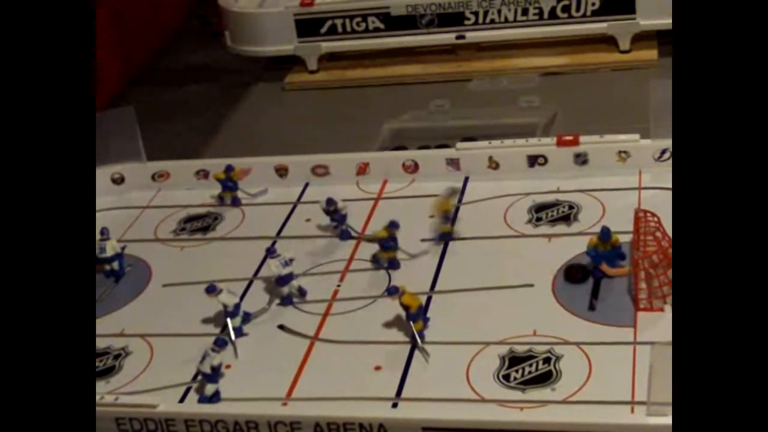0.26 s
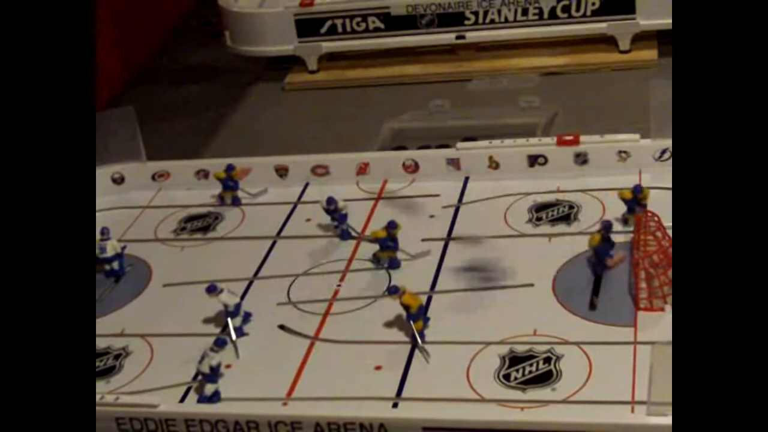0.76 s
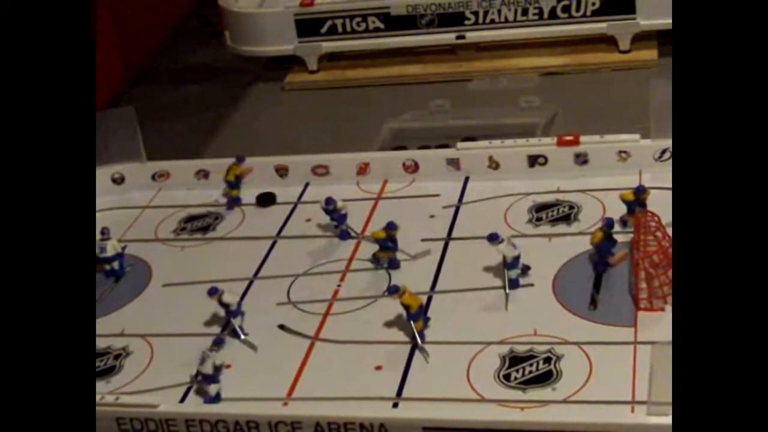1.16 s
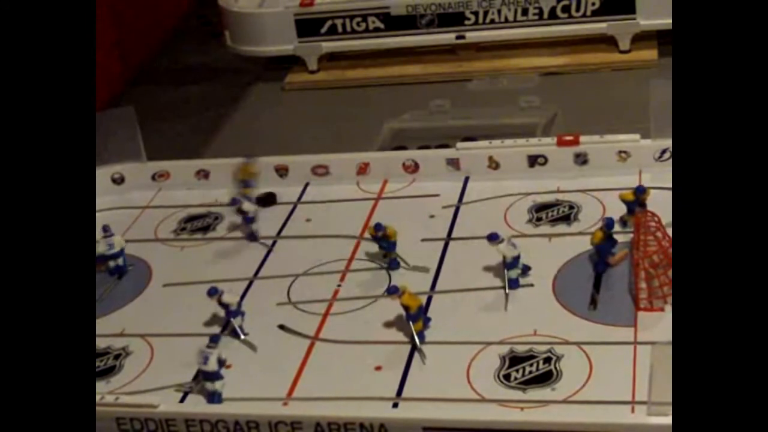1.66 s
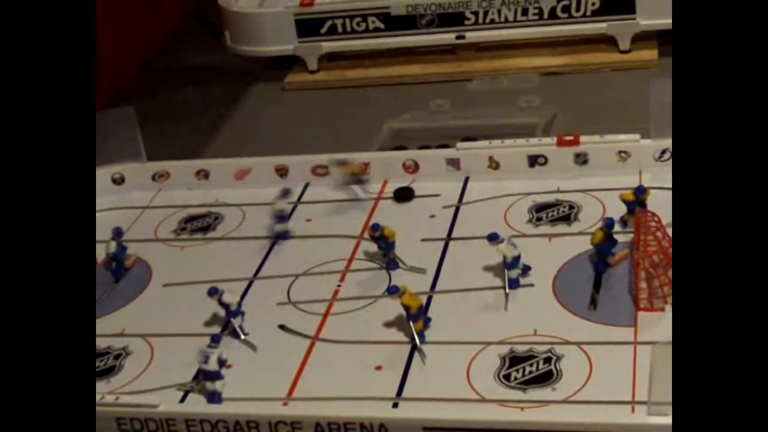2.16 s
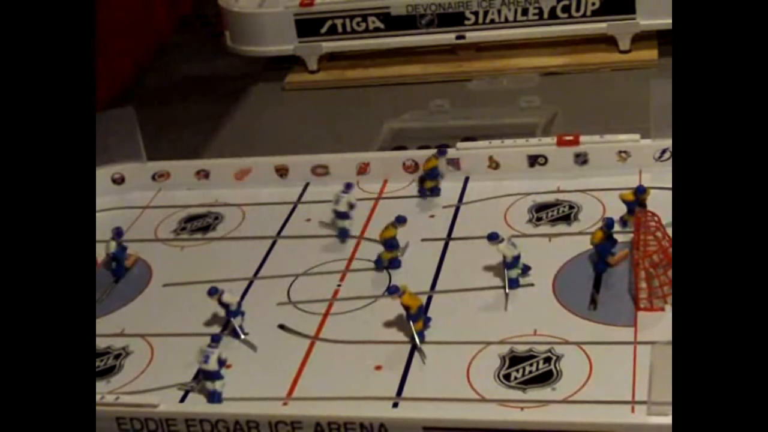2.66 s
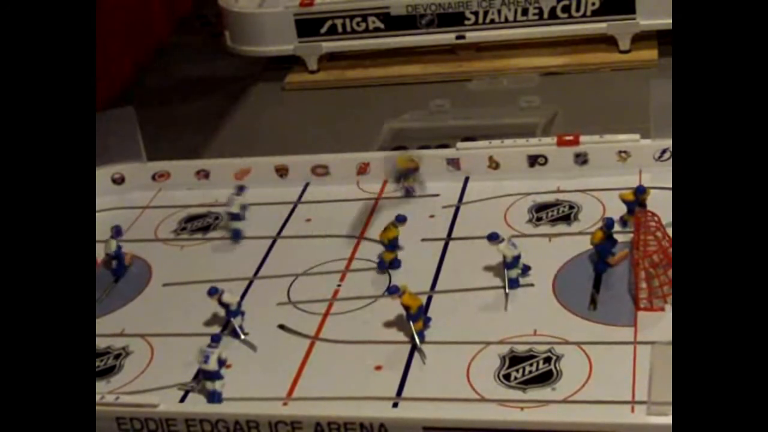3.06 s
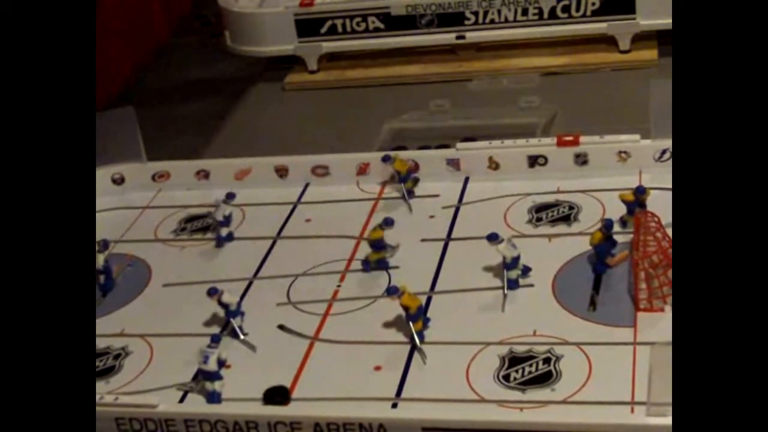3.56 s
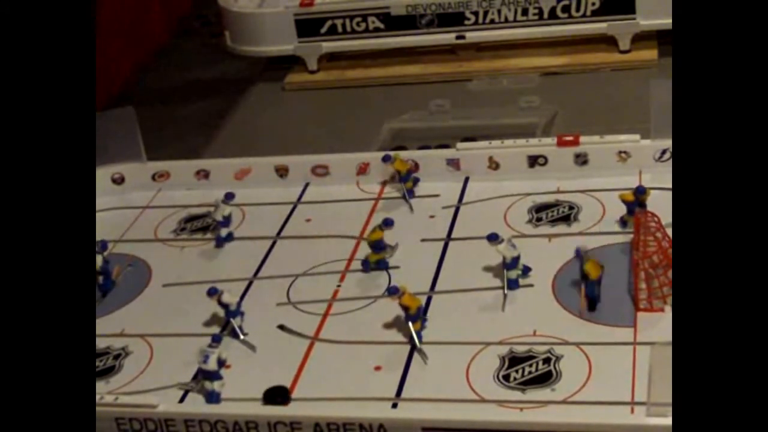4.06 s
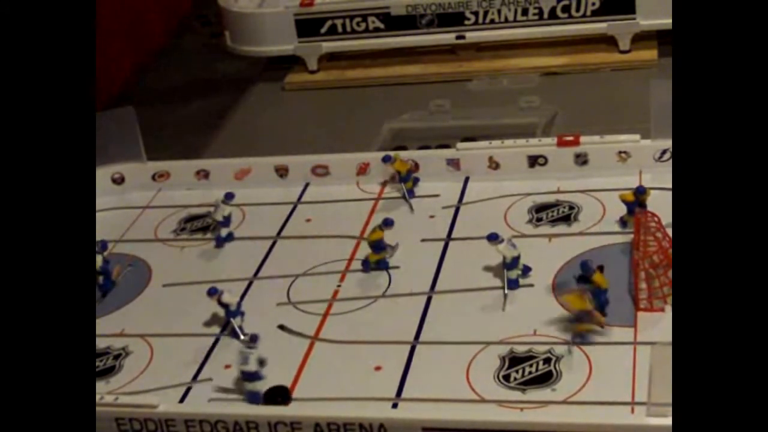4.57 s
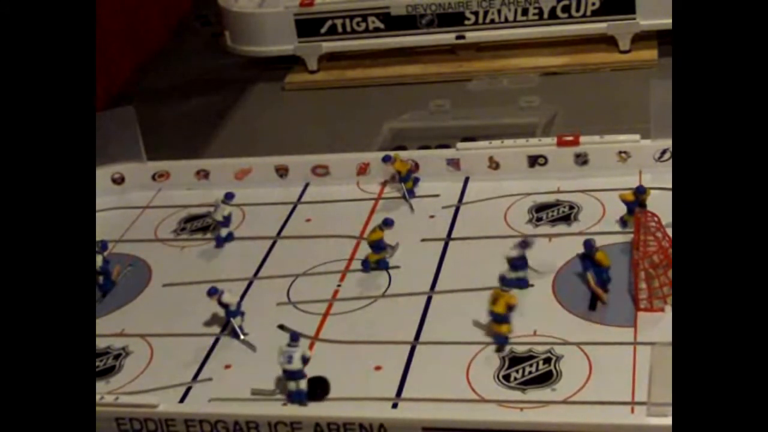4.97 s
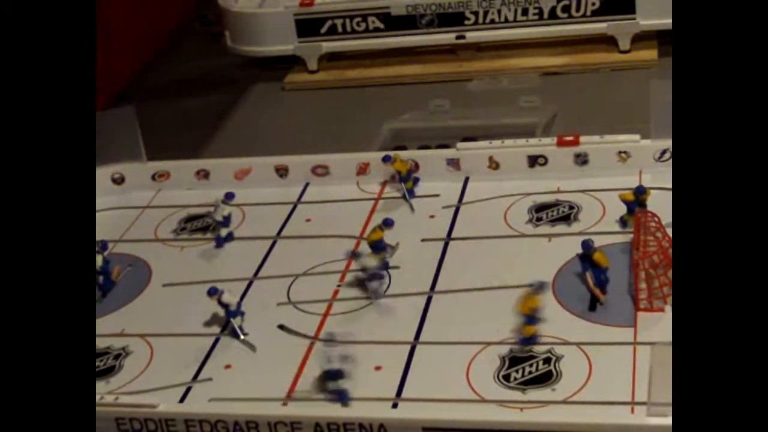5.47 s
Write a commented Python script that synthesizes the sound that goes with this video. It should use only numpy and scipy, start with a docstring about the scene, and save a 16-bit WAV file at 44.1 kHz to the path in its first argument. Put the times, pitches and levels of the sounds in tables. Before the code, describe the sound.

Close, dry clacks and scraping rods of a table hockey game, broken by three overloading cracks of the puck against the rink boards.

```python
"""Knocks, rattles, clacks and sliding rods of a table hockey game in a small room, close to the microphone,
with three hard shots that bang into the boards and overload the microphone.
Touches on the plastic rink excite a bank of damped modes; blade, boards and rods add modes of their own.
Sliding is a stream of tiny friction slips; the room is a diffuse noise tail over the blows.
Steady room noise and a narrow electronic hiss lie beneath."""
import sys
import numpy as np
from scipy import signal
from scipy.fft import rfft, irfft, next_fast_len
from scipy.io import wavfile

SR = 44100
rng = np.random.default_rng(int(sys.argv[2]) if len(sys.argv) > 2 else 0)


def generate_wav(sig):
    """Save sig (samples, or channels by samples) to the path in sys.argv[1] as 16-bit PCM at SR."""
    pcm = np.round(np.clip(np.atleast_2d(sig).T, -1, 1) * 32767).astype(np.int16)
    wavfile.write(sys.argv[1], SR, pcm)


N = 252693
TIME = np.arange(N) / SR
RING_TIME = TIME[:SR // 4]
ATTACK_SAMPLES = 600


def from_db(db):
    """Decibels to gain."""
    return 10 ** (np.asarray(db) / 20)


def rms_one(x):
    """Scale to unit rms."""
    return x / np.sqrt(np.mean(x ** 2) + 1e-20)


def at_level(sound, db):
    """Set the rms of the attack."""
    return from_db(db) * sound / np.sqrt(np.mean(sound[:ATTACK_SAMPLES] ** 2))


def at_hz(points, hz):
    """Read a table on a log-frequency axis."""
    table_hz, value = np.transpose(points)
    return np.interp(np.log(np.maximum(hz, 1)), np.log(table_hz), value)


def add(out, s, sound):
    """Mix a sound in at time s, or at 0 if s is negative."""
    i = max(round(s * SR), 0)
    out[i:i + len(sound)] += sound[:N - i]


def coloured(x, spectrum):
    """Filter a signal by a table of (frequency [Hz], gain [dB]); rms 1."""
    size = next_fast_len(N)
    gain = from_db(at_hz(spectrum, np.fft.rfftfreq(size, 1 / SR)))
    return rms_one(irfft(rfft(x, size) * gain, size)[:N])


def dying(t, t60):
    """Envelope that loses 60 dB in t60 seconds."""
    return np.exp(-np.log(1000) * t / t60)


def drift(per_s):
    """Slow random curve: straight lines between normal random knots, per_s of them a second."""
    knots = rng.standard_normal(2000)
    return np.interp(TIME * per_s, np.arange(len(knots)), knots)


def background(floor_db=-55.5, whine_db=-63.5, whine_hz=7850, whine_width_hz=290):
    """Quiet room noise and a narrow electronic hiss, both filtered white noise."""
    # room noise: (frequency [Hz], relative density [dB])
    floor_spectrum = [(20, -1), (100, -9), (250, -3.5), (600, 14.5), (1500, -3.5), (3000, -15),
                      (6000, -5.5), (8500, -5), (10000, -16), (15000, -21)]
    floor = coloured(rng.standard_normal(N), floor_spectrum)
    edges_hz = [whine_hz - whine_width_hz / 2, whine_hz + whine_width_hz / 2]
    band = signal.butter(2, edges_hz, "band", fs=SR, output="sos")
    whine = rms_one(signal.sosfilt(band, rng.standard_normal(N)))
    return from_db(floor_db) * floor + from_db(whine_db) * whine


def room(x, wet_db=-11, build_s=0.003, wall_hz=5000):
    """Diffuse echoes: a noise tail that builds up quickly, decays band by band and is weaker in the treble."""
    # reverberation: (frequency [Hz], t60 [s])
    room_t60 = [(150, 0.11), (600, 0.37), (1500, 0.29), (4000, 0.3), (8000, 0.33), (15000, 0.35)]
    t = TIME[:SR * 2 // 3]
    edges_hz = np.geomspace(100, 17000, 9)
    tail = 0
    for low, high in zip(edges_hz, edges_hz[1:]):
        bandpass = signal.butter(2, [low, high], "band", fs=SR, output="sos")
        band = signal.sosfilt(bandpass, rng.standard_normal(len(t)))
        hz = np.sqrt(low * high)
        tail = tail + band * dying(t, at_hz(room_t60, hz)) / np.hypot(1, hz / wall_hz)
    tail = tail * (1 - np.exp(-(t / build_s) ** 2))
    tail = tail / np.sqrt(2 * np.sum(tail ** 2))   # energy 1/2, before wet_db
    return from_db(wet_db) * signal.fftconvolve(x, tail)[:N]


def pushed(column, idle_db, fall_db_per_s, grip_s=0.025, swell_db=3):
    """Friction gain: each push takes hold, swells until the hand stops, then coasts to rest, over steady fidgeting."""
    # pushes of a rod: (start [s], length [s], rumble of the rink [dB], hiss of the rubbing [dB])
    pushes = [(-0.02, .04, -32, -40), (.17, .06, -46, -58), (.25, 0.35, -37, -50), (0.643, .13, -30.5, -37),
              (0.812, 0.076, -29, -40), (1.26, 0.045, -33.5, -44), (1.314, 0.21, -26, -38.5),
              (1.419, 0.061, -18, -24), (1.543, 0.14, -30.5, -43.5), (1.8, 0.11, -37.5, -45),
              (1.964, 0.39, -37, -51), (2.341, 0.083, -32.5, -51.5), (2.702, 0.27, -41.5, -53.5),
              (3.071, 0.12, -25, -31), (3.26, 0.12, -35.5, -48), (3.452, 0.06, -33.5, -42),
              (3.984, 0.11, -34.5, -50), (4.125, 0.083, -30, -46.5), (4.267, 0.51, -41, -54),
              (4.813, 0.16, -45.5, -64), (5.09, 0.12, -40.5, -50.5), (5.502, 0.042, -18, -25.5),
              (5.615, 0.046, -25.5, -46)]
    power = from_db(idle_db) ** 2
    for start, length, *levels in pushes:
        t = TIME - start
        swell = swell_db * np.clip(1 - t / length, 0, 1)
        coast = fall_db_per_s * np.maximum(t - length, 0)
        hold = np.clip(t / grip_s, 0, 1)
        power = power + (hold * from_db(levels[column] - swell - coast)) ** 2
    return np.sqrt(power)


def slips(per_s, spread_db):
    """Friction as a random stream of single-sample slips of uneven size and either sign."""
    sizes = from_db(spread_db * np.minimum(rng.exponential(1, N), 4))
    return (rng.random(N) < per_s / SR) * sizes * rng.choice([-1, 1], N)


def rubbed(grip, spectrum, t60, count=5):
    """Each rod slips on its own and rings its own part of the sheet, as decaying noise; grip is shared."""
    out = 0
    for _ in range(count):
        friction = slips(per_s=150, spread_db=3) * grip * from_db(2.8 * drift(22))
        ring = rng.standard_normal(len(RING_TIME)) * dying(RING_TIME, t60)
        out = out + signal.oaconvolve(friction, ring)[:N]
    return coloured(out, spectrum)


def sliding(rumble_gain, hiss_gain, rumble_trim_db=-1.5, hiss_trim_db=-1.5, catch_db=1.5):
    """Rods pushed along their slots: slips rumble in the sheet and hiss at the contact, under one uneven grip."""
    # friction heard through the sheet: (frequency [Hz], relative gain [dB])
    rumble_spectrum = [(120, -33), (200, -28.5), (300, -10), (450, -6), (700, 3.5), (1300, 2.5),
                       (2300, 0.5), (3200, -2.5), (5000, -18), (10000, -33)]
    # friction heard at the contact: (frequency [Hz], relative gain [dB])
    hiss_spectrum = [(2000, -27), (3500, 2.5), (5000, 2), (7000, -1.5), (10000, -5.5), (15000, -22)]
    grip = from_db(catch_db * drift(35))
    rumble = from_db(rumble_trim_db) * rumble_gain * rubbed(grip, rumble_spectrum, t60=0.088)
    hiss = from_db(hiss_trim_db) * hiss_gain * rubbed(grip, hiss_spectrum, t60=0.074)
    return rumble + hiss


def rink_modes(peak_width_hz=32, count=700):
    """The thin rink has hundreds of damped modes, closest in the bass: their pitches and rings (attack rms 1)."""
    # colour of the dense modes: (frequency [Hz], relative density [dB])
    rink_spectrum = [(100, -31), (200, -42), (300, -29), (400, -16.5), (560, -5.5), (850, -5.5),
                     (1400, 1.5), (1900, 0), (2500, 0), (3500, -4.5), (6500, -10), (10000, -16.5),
                     (15000, -30.5)]
    # damping of the plastic: (frequency [Hz], t60 [s])
    plastic_t60 = [(200, 0.35), (600, 0.21), (1500, 0.12), (3000, 0.1), (7000, 0.071), (15000, 0.083)]
    # strongest resonances: (frequency [Hz], boost over the dense modes [dB])
    rink_peaks = [(571, 2.5), (862, 1.5), (1035, 3), (1385, 2.5), (1517, 2), (1662, 1), (2245, 2),
                  (2770, 0)]
    place = (np.arange(count) + rng.random(count)) / count
    hz = (np.sqrt(100) + place * (np.sqrt(16000) - np.sqrt(100))) ** 2
    t = RING_TIME[:SR // 7]
    peaks_db = sum(db * np.exp(-((hz - centre) / peak_width_hz) ** 2) for centre, db in rink_peaks)
    height = from_db(at_hz(rink_spectrum, hz) + peaks_db) * np.sqrt(np.sqrt(hz))   # sparser modes carry more
    phase = 2 * np.pi * (hz[:, None] * t + rng.random((count, 1)))
    rings = height[:, None] * np.sin(phase) * dying(t, at_hz(plastic_t60, hz)[:, None])
    attack_power = np.sum(np.mean(rings[:, :ATTACK_SAMPLES] ** 2, axis=1))
    return hz, rings / np.sqrt(attack_power)


def contact(rink, bass_db, treble_db, spot_hz, spread_s, spot_db=6, spot_octaves=0.13,
            bass_hz=560, bass_octaves=0.86, treble_hz=3800):
    """One touch: place favours modes near spot_hz, weight the hollow of the table, hardness the treble."""
    hz, rings = rink
    hollow = np.exp(-(np.log2(hz / bass_hz) / bass_octaves) ** 2)
    spot = np.exp(-(np.log2(hz / spot_hz) / spot_octaves) ** 2)
    top = 1 / (1 + (treble_hz / hz) ** 4)
    strength = from_db(bass_db * hollow + spot_db * spot + treble_db * top)
    attack_db = 10 * np.log10(strength ** 2 @ np.mean(rings[:, :ATTACK_SAMPLES] ** 2, axis=1))
    ring = at_level((rng.standard_normal(len(hz)) * strength) @ rings, attack_db)
    return ring * (1 - np.exp(-RING_TIME[:len(ring)] / spread_s))   # bending waves take time to fill the sheet


def struck(modes, uneven_db=0):
    """Ring of a few modes (Hz, dB, t60 s) after one tap, their levels scattered by uneven_db."""
    out = 0
    for hz, db, t60 in modes:
        gain = from_db(db + uneven_db * rng.normal())
        out = out + gain * np.sin(2 * np.pi * hz * RING_TIME) * dying(RING_TIME, t60)
    return out


def ticks(rink, push, per_s=22, tick_db=-5, spread_db=4, hardness_db=4, spot_hz=1900, spot_octaves=0.53,
          count=230):
    """Loose figures tick at random on their moving rods, as strongly as the rods are pushed."""
    out = np.zeros(N)
    # count candidates, thinned at random to per_s a second
    for s, chance in rng.random((count, 2)) * [TIME[-1], count / TIME[-1]]:
        if chance >= per_s:
            continue
        size, hardness, place = rng.standard_normal(3)
        treble_db = hardness_db * (min(hardness, 1) - 1)
        tick = contact(rink, 0, treble_db, spot_hz * 2 ** (spot_octaves * place), spread_s=0.00033)
        add(out, s, push[int(s * SR)] * from_db(tick_db + spread_db * min(size, 1)) * tick)
    return out


def tinks(tick_t60=0.065):
    """Thin metallic pings of a steel rod tapped in its guide: ringing modes plus a bright noise tick."""
    # taps: (time [s], tick level [dB], ring level [dB])
    taps = [(0.121, -32.5, -47), (0.161, -46, -37), (4.742, -37, -37.5)]
    # steel rod, bending in two planes so that its main mode beats: (frequency [Hz], level [dB], t60 [s])
    rod_modes = [(6440, -11, 0.22), (8330, -13, .07), (8760, -5, 0.13), (9200, -8, .07), (9930, -1.5, 0.16),
                 (9980, -3, 0.095), (12300, -12, .05)]
    out = np.zeros(N)
    bright = signal.butter(2, 6500, "high", fs=SR, output="sos")
    for s, tick_db, ring_db in taps:
        noise = signal.sosfilt(bright, rng.standard_normal(len(RING_TIME)))
        tick = noise * dying(RING_TIME, tick_t60)
        add(out, s, from_db(ring_db) * struck(rod_modes) + from_db(tick_db) * tick)
    return out


def clacks(rink, blade_db=-1, body_db=-2):
    """A hard stick blade snaps on the puck, rings brightly and shakes the rink under it."""
    # snaps: (time [s], level before trims [dB], hardness as treble [dB])
    snaps = [(0.2252, -43.5, 15.5), (0.6868, -16, 7), (1.6837, -38, 15.5), (2.2316, -44, 14),
             (5.5011, -28, 12), (5.6295, -30, 20.5)]
    # blade and puck: (frequency [Hz], relative level [dB], t60 [s])
    blade_modes = [(4480, -37, .03), (5560, -7, 0.023), (6550, -10, 0.051), (7400, -6.5, 0.067),
                   (8070, -5, 0.022), (10500, 7, 0.029), (11700, -6, 0.03)]
    out = np.zeros(N)
    for s, db, treble_db in snaps:
        body = contact(rink, bass_db=5, treble_db=treble_db, spot_hz=1620, spread_s=0.00025)
        add(out, s, at_level(struck(blade_modes, uneven_db=8.5), db + blade_db))
        add(out, s, from_db(db + body_db) * body)
    return out


def knocks(rink, bounce_db=-4, gain_db=-2, count=4, graze_s=.008, graze_db=-15):
    """A loose player grazes, hits, then bounces in its slot ever more weakly, for longer after a harder hit."""
    # players on rink and puck: (time [s], level before gain_db [dB], bass [dB], treble [dB], spot resonance [Hz])
    hits = [(0.001, -23, 5, 3.5, 1340), (0.141, -37.5, 2, 5, 1630), (0.27, -23, 7.5, -4, 1260),
            (0.342, -35.5, 9.5, 0.5, 640), (0.366, -24, -7, -21, 1530), (0.461, -35.5, 7, -2, 2850),
            (0.498, -31.5, 8, 2.5, 2000), (0.514, -23.5, 9, -7.5, 1820), (0.555, -38.5, 12, 6, 1820),
            (0.637, -33, 17, 2, 1760), (0.734, -22.5, 8, 3.5, 1060), (0.798, -33, 2, 13, 1340),
            (0.894, -33.5, 6, 9.5, 1290), (1.093, -38.5, -5, -5, 2370), (1.23, -40.5, -15, -3, 3000),
            (1.265, -27.5, -11, 0.5, 2400), (1.319, -20, -8, -0.5, 2480), (1.329, -18.5, -5, -4, 3220),
            (1.465, -17.5, 5.5, 3.5, 2330), (1.535, -18.5, -17, -4, 2260), (1.683, -24.5, -8, -15, 1690),
            (1.729, -12.5, -7, -8, 2230), (1.778, -24.5, 2.5, -6, 1880), (1.929, -22.5, -0.5, -9, 2520),
            (2.07, -32.5, 6, 1, 1180), (2.23, -32, 6, 0, 1080), (2.29, -35, 5.5, -8, 1160),
            (2.382, -25.5, -0.5, -7.5, 1750), (2.421, -24.5, -13, -16, 2320), (2.555, -31, 3.5, -10, 1370),
            (2.809, -34, -14, -23, 1970), (2.884, -19.5, -4, -13, 2130), (2.912, -26.5, 0, -13, 1570),
            (3.042, -33.5, 10, 0, 1040), (3.066, -34.5, 5, 8.5, 1080), (3.093, -22.5, 8, 2.5, 1020),
            (3.157, -22.5, 1.5, -28, 1610), (3.192, -21.5, 13, -1, 1400), (3.473, -26.5, -8, 3.5, 3000),
            (3.486, -17.5, 6.5, -12, 3130), (3.7, -42, -14, -9, 1350), (3.829, -40, 9.5, -7, 850),
            (3.902, -27, 5.5, -3, 1800), (3.987, -31, 2, -12, 1040), (4.133, -17, -4.5, -14.5, 1630),
            (4.159, -25, -12, -7, 1340), (4.292, -32.5, 7.5, 4, 1610), (4.516, -27.5, -0.5, -10.5, 2360),
            (4.719, -37, 8.5, -2.5, 1810), (5.098, -35.5, 10, -5, 1730), (5.208, -40, 16, -3, 750),
            (5.25, -41, 10.5, 0, 765), (5.426, -32, 7, -26, 1610), (5.466, -36, -1, -0.5, 1900),
            (5.49, -33, 2, -8, 2150), (5.501, -23.5, 12.5, 6, 2940), (5.557, -22.5, 8, -1, 2070),
            (5.631, -22, -10, 0, 2600)]
    rattle_ref_s, rattle_ref_db, rattle_doubles_db = .009, -28, 12   # decay time at the reference level
    out = np.zeros(N)
    for s, db, bass_db, treble_db, spot_hz in hits:
        hit_db = db + gain_db
        rattle_s = rattle_ref_s * 2 ** ((db - rattle_ref_db) / rattle_doubles_db)
        graze = contact(rink, bass_db, treble_db, spot_hz, spread_s=0.0019)
        add(out, s - graze_s, from_db(hit_db + graze_db) * graze)
        add(out, s, from_db(hit_db) * contact(rink, bass_db, treble_db, spot_hz, spread_s=0.00044))
        # bounce delays, in decay times
        for late in (np.arange(count) + rng.uniform(.5, 1.5, count)) * 2 / count:
            bounce_hz = spot_hz * 2 ** rng.normal(0, 0.1)
            bounce = contact(rink, bass_db, treble_db, bounce_hz, spread_s=0.00046)
            add(out, s + late * rattle_s, from_db(hit_db + bounce_db) * np.exp(-late) * bounce)
    return out


def shots(rink, board_t60=0.075, crack_t60=0.19):
    """The puck cracks against the boards, which ring with two modes of the spot it hits."""
    # shots: (time [s], crack level [dB], bass [dB], treble [dB], lower mode [Hz], upper mode [Hz], ring [dB])
    impacts = [(0.812, -4, -1, -2.5, 1034, 1270, -16.5), (3.2121, -4, -8, -1.5, 1389, 1616, -5),
               (5.6445, -9, 2, 4.5, 1055, 2378, -10)]
    out = np.zeros(N)
    for s, db, bass_db, treble_db, low_hz, high_hz, ring_db in impacts:
        crack = contact(rink, bass_db, treble_db, high_hz, spread_s=.0003, spot_db=3, spot_octaves=.3)
        add(out, s, from_db(db) * crack * dying(RING_TIME[:len(crack)], crack_t60))
        add(out, s, struck([(low_hz, ring_db, board_t60), (high_hz, ring_db, board_t60)]))
    return out


def scene(radiation_hz=190):
    """The game and its room; the small rink radiates little bass from the blows."""
    rink = rink_modes()
    rumble_gain = pushed(0, idle_db=-49, fall_db_per_s=110)
    hiss_gain = pushed(1, idle_db=-60, fall_db_per_s=128)
    blows = knocks(rink) + shots(rink) + clacks(rink) + tinks() + ticks(rink, rumble_gain)
    blows = signal.sosfilt(signal.butter(2, radiation_hz, "high", fs=SR, output="sos"), blows)
    return (blows + room(blows) + sliding(rumble_gain, hiss_gain) + background())[None]


def record(dry, top=1.0, low_cut_hz=130, cutoff_hz=15500):
    """The microphone clips peaks near top, thins the bass and cuts everything above cutoff_hz."""
    clipped = dry / (1 + (dry / top) ** 12) ** (1 / 12)
    thin = signal.sosfilt(signal.butter(1, low_cut_hz, "high", fs=SR, output="sos"), clipped)
    return signal.sosfilt(signal.ellip(10, .2, 70, cutoff_hz, fs=SR, output="sos"), thin)


dry = scene()
out = record(dry)
generate_wav(out)
```